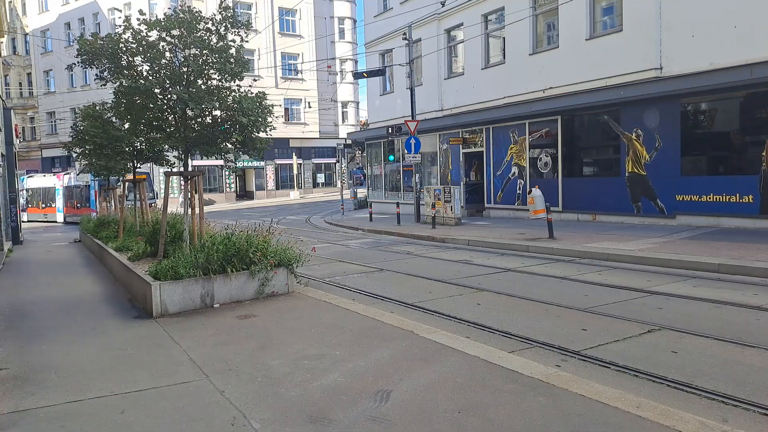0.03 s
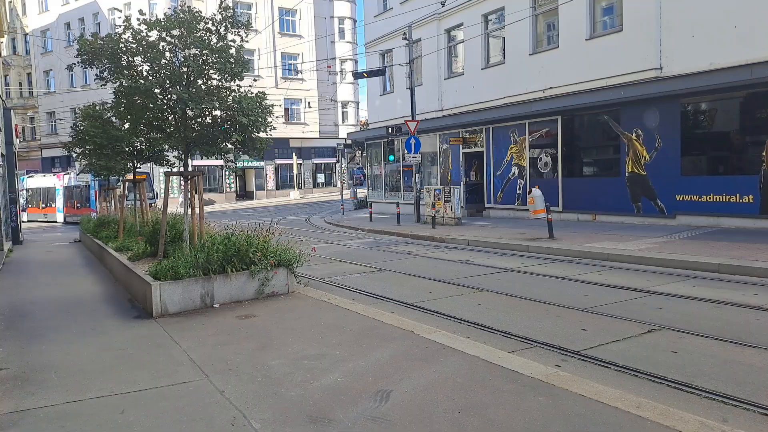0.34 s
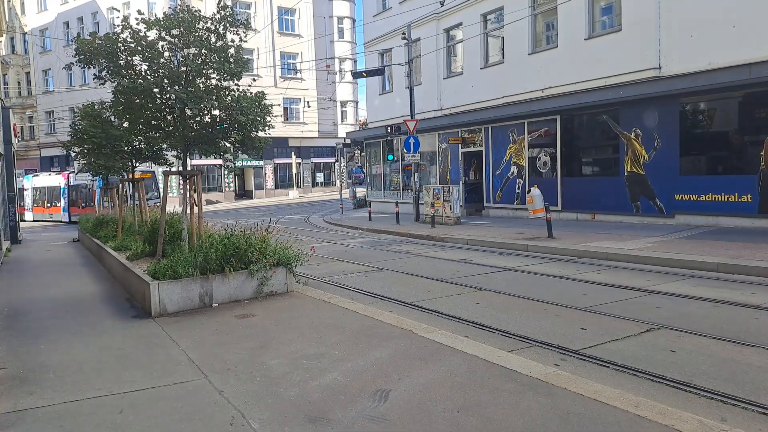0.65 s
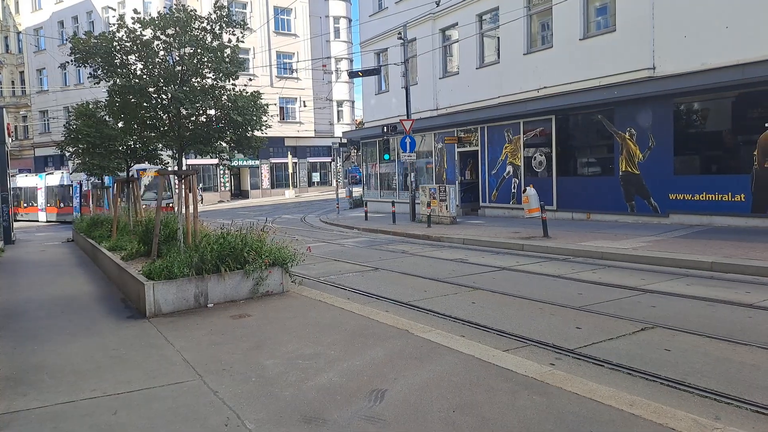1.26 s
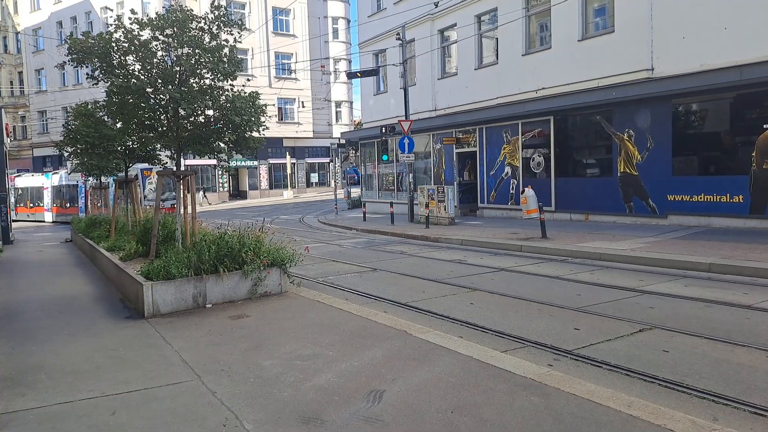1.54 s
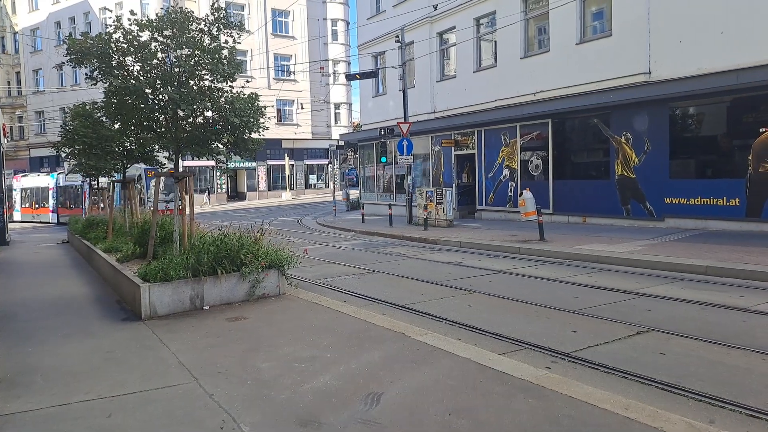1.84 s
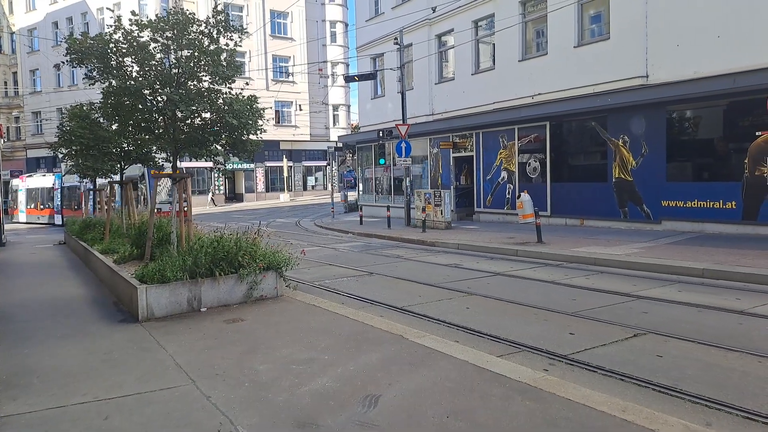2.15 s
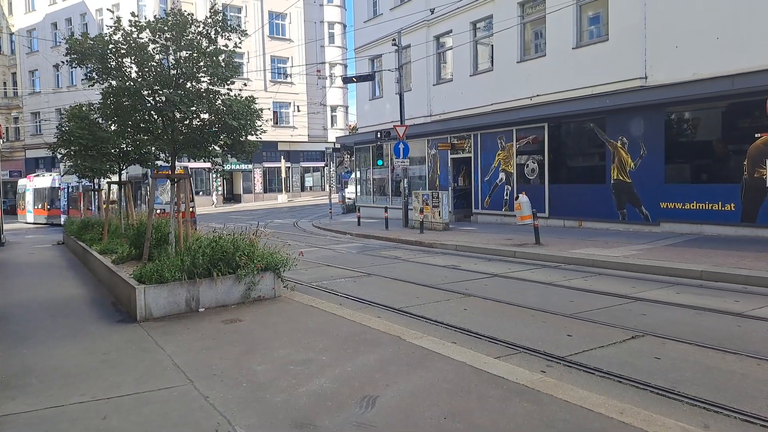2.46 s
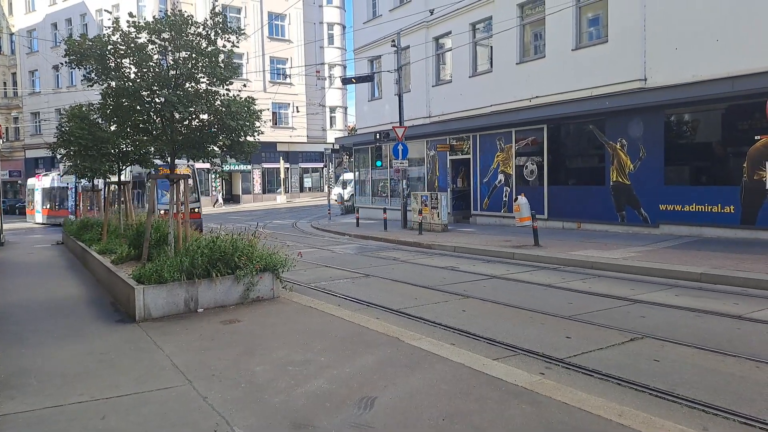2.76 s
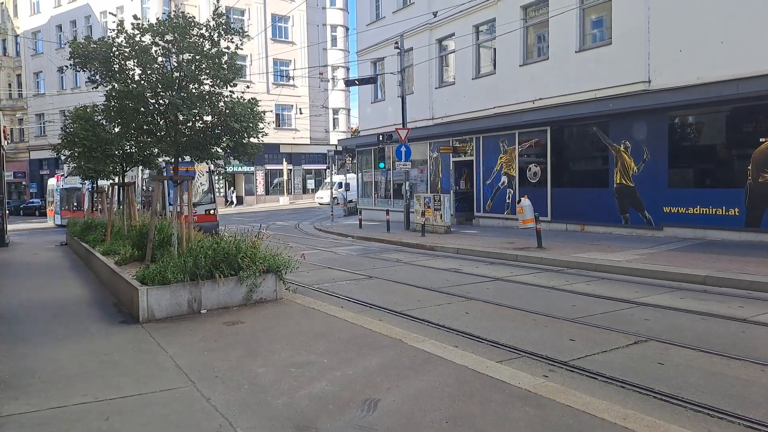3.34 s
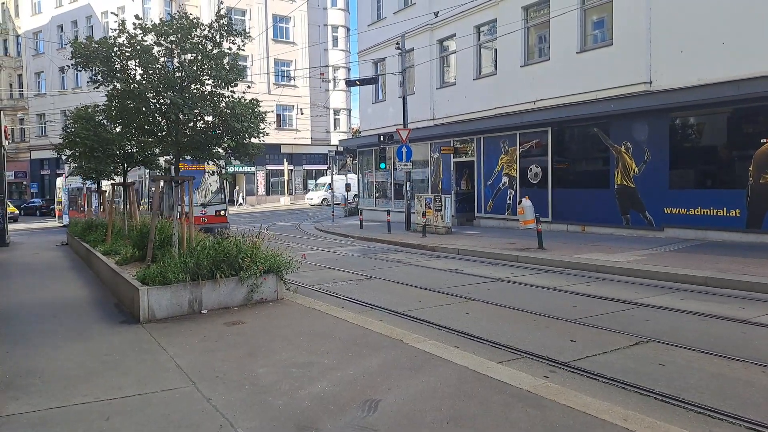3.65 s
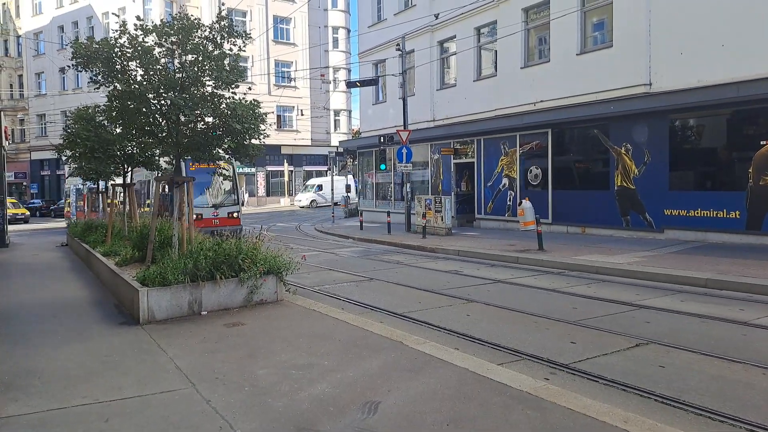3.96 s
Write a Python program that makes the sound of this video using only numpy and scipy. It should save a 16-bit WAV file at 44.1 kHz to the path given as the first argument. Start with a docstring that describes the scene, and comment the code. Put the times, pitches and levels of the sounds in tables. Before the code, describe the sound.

A tram rolls round a far corner of a city street with a low drone and faint, thin rail tones. Distant traffic rumbles and hisses, while puffs of wind brush the hand-held microphone.

```python
"""A tram rolls round a far corner of a city street: its body drones, its wheels ring, the rails sing thinly.
A deep rumble surges underneath, and distant traffic roars with a high tyre hiss that comes and goes.
Puffs of wind brush the two microphone ports of a small hand-held camera.
The sound fades in after a short silence, with a brief rush of air and one dull bump on the left."""
import sys
import numpy as np
from scipy import signal
from scipy.fft import rfft, irfft
from scipy.io import wavfile
from scipy.ndimage import uniform_filter1d

SR = 44100
rng = np.random.default_rng(int(sys.argv[2]) if len(sys.argv) > 2 else 0)


def store_pcm(level_fs):
    """Save levels as 16-bit WAV."""
    pcm = np.round(np.clip(level_fs, -1, 1) * 32767).astype(np.int16)
    wavfile.write(sys.argv[1], SR, np.atleast_2d(pcm).T)


N = 176400
T = np.arange(N) / SR
FREQS = np.maximum(np.arange(N // 2 + 1) * SR / N, 1)


def undb(db):
    """Decibels to gain."""
    return 10 ** (np.asarray(db) / 20)


def unit(x):
    """Scale to rms 1."""
    return x / np.sqrt(np.mean(x ** 2))


def fader(table, column=1):
    """A fader ride: gain over time from one dB column of a table."""
    rows = np.array(table)
    return undb(np.interp(T, rows[:, 0], rows[:, column]))


def across(points):
    """Values at all frequencies, joined on a log axis."""
    rows = np.array(points)
    return np.interp(np.log(FREQS), np.log(rows[:, 0]), rows[:, 1])


def white():
    """Spectrum of fresh white noise."""
    return rfft(rng.standard_normal(N))


def noise(colour):
    """Noise of a given colour, rms 1."""
    return unit(irfft(white() * undb(across(colour)), N))


def wander(hz):
    """Smooth random drift, rms 1, mostly slower than hz."""
    return unit(irfft(white() * np.exp(-(FREQS / hz) ** 2), N))


def pan(db):
    """Left and right gains, the left louder by db."""
    return undb(np.array([[db], [-db]]) / 2)


def gate(start_s, end_s, edge_s):
    """Rise, hold and release, the ramps centred on start and end."""
    return np.clip((T - start_s) / edge_s + .5, 0, 1) * np.clip((end_s - T) / edge_s + .5, 0, 1)


def even(x, share, span_s=0.058):
    """Compress away a share of a noise's chance swells; returns rms 1."""
    power = uniform_filter1d(x ** 2, int(span_s * SR))
    power = uniform_filter1d(power, int(span_s * SR / 2)) + 1e-6
    return unit(x / power ** (share / 2))


def street(colour, octaves=9):
    """Far rolling noise: octave bands wander, and house fronts leave it only partly alike at the ports."""
    # How alike the ports are. Each row: frequency in Hz, coherence (below 0 counts as 0).
    likeness = [(100, 0.75), (330, .87), (530, 0.83), (750, 0.7), (980, 0.41), (1150, 0.66), (1400, 0.52),
                (1680, 0.2), (1880, 0.7), (2030, 0.8), (2320, 0.1), (2700, 0.4), (3100, 0.33), (4700, -0.3),
                (8000, -0.07)]
    # Phase between the ports. Each row: frequency in Hz, lead of the left in radians.
    lead = [(80, 0), (300, .15), (480, .55), (800, .45), (930, .8), (1080, 2.8), (1350, 3.45), (1600, 4.2),
            (1720, 4.9), (1830, 6.05), (2000, 6.3), (2250, 6.9), (2450, 8.8), (2800, 9.9), (3400, 10.6),
            (4700, 13.3)]
    # Stereo balance. Each row: frequency in Hz, left over right in dB.
    balance = [(200, 0), (650, 1), (1300, 0.1), (2600, 0.5), (4400, 1.5), (6000, 2.5), (7500, 3), (9700, 7),
               (12000, 0), (15000, 3.5)]
    alike = np.clip(across(likeness), 0, 1)
    shared = white() * np.sqrt(alike)
    ports = []
    for side in (1, -1):
        coherent = shared * np.exp(.5j * side * across(lead))
        diffuse = white() * np.sqrt(1 - alike)
        ports.append((coherent + diffuse) * undb(side * across(balance) / 2))
    spectrum = np.array(ports) * undb(across(colour))
    octave = np.clip(np.log2(FREQS / 60), 0, octaves - 1)
    out = 0
    for k in range(octaves):
        band = irfft(spectrum * np.maximum(1 - abs(octave - k), 0), N)
        swell_db, flicker_db = .5 * wander(hz=3.2), 1.38 * wander(hz=16.4)
        out = out + band * undb(swell_db + flicker_db)
    return unit(out)


def tram():
    """Drone of the tram's body and the broad ring of its wheels on the rails."""
    # The tram's fader ride. Each row: time in seconds, relative drone and ring levels in dB.
    levels = [(0.6, -34, -40.5), (0.88, -37, -39), (0.93, -38, -45), (1.06, -37.5, -35.5),
              (1.13, -37, -43.5), (1.18, -34.5, -42), (1.48, -37.5, -41.5), (1.52, -32.5, -46),
              (1.63, -40, -43), (1.74, -31.5, -46.5), (1.9, -36.5, -43), (2.13, -35, -43.5),
              (2.27, -32.5, -37.5), (2.41, -35, -43), (2.43, -33.5, -37), (2.57, -31.5, -39.5),
              (2.62, -40, -43), (2.68, -31.5, -35), (2.94, -35, -41), (2.98, -29.5, -42),
              (3.04, -33.5, -37), (3.34, -29.5, -38.5), (3.64, -33, -41.5), (3.78, -38, -42.5),
              (3.92, -32.5, -42), (3.97, -37.5, -38.5)]
    # Low, hollow colour of the body. Each row: frequency in Hz, EQ gain in dB.
    body_colour = [(60, -23), (120, -4.5), (170, -1.5), (240, -0.5), (310, -5), (400, -9.5), (520, -18),
                   (800, -27.5), (5000, -110)]
    # Midrange colour of the wheels. Each row: frequency in Hz, EQ gain in dB.
    wheel_colour = [(300, -23), (520, -9), (620, -3), (720, 0.5), (860, -2.5), (1050, -10), (1500, -29),
                    (6000, -100)]
    drone = fader(levels, column=1) * even(street(body_colour), share=.4)
    ring = fader(levels, column=2) * even(street(wheel_colour), share=.4)
    return undb(1) * (drone + ring)


def rail_tones():
    """Rubbing wheels excite narrow resonances that waver on their way down the street."""
    # Thin singing tones. Each row: start and end in seconds, pitch and width in Hz,
    # level in dB, left over right in dB.
    tones = [(0.35, 4.1, 3368, 48, -60.5, -1), (1.17, 3.1, 4597, 12, -67, -5), (1.17, 3, 4653, 12, -66, 1),
             (1.22, 1.46, 4640, 110, -61, 2), (2.2, 2.42, 4620, 110, -58, 2),
             (2.47, 2.72, 4630, 110, -61, 0), (1.25, 1.85, 9250, 170, -78, 4),
             (2.05, 2.6, 9250, 170, -76, 4), (1.0, 4.1, 6730, 110, -76, -3), (2.0, 2.35, 5210, 70, -69, 1),
             (2.7, 3.2, 5211, 60, -67, 1), (3.76, 4.1, 5215, 70, -66, 1), (3.2, 3.42, 12200, 900, -71, 3),
             (3.35, 3.72, 12500, 650, -78.5, 5)]
    out = 0
    for start, end, hz, width, db, pan_db in tones:
        resonance = 1 / (1 + 2 * ((FREQS - hz) / width) ** 2)
        tone = unit(np.array([irfft(white() * resonance, N) for _ in range(2)]))
        waver_db = 1.5 * wander(hz=6)
        envelope = gate(start, end, edge_s=0.11) * undb(db + waver_db)
        out = out + even(tone, share=.45) * envelope * pan(pan_db)
    return out


def rumble():
    """Deep surging rumble, nearly the same on both sides."""
    # The surges. Each row: time in seconds, relative level in dB.
    surges = [(0.5, -26.5), (0.56, -22.5), (0.67, -28), (0.69, -18.5), (0.8, -29.5), (0.84, -22.5),
              (0.88, -30.5), (0.93, -25), (1.0, -30), (1.02, -21.5), (1.09, -37), (1.19, -28.5),
              (1.22, -39), (1.26, -22.5), (1.32, -32), (1.4, -43), (1.49, -21), (1.58, -41), (1.6, -25),
              (1.65, -39.5), (1.75, -20.5), (1.79, -35.5), (1.84, -20.5), (1.94, -40.5), (1.96, -31),
              (2.1, -37.5), (2.15, -24), (2.33, -30.5), (2.35, -40), (2.43, -26.5), (2.46, -33),
              (2.51, -21), (2.61, -48), (2.66, -23), (2.69, -29), (2.72, -20.5), (2.79, -35), (2.87, -18),
              (2.89, -30), (2.93, -22), (2.95, -39), (3.04, -24), (3.09, -27.5), (3.12, -21.5), (3.15, -30),
              (3.29, -20), (3.34, -28), (3.38, -18), (3.41, -23.5), (3.74, -25), (3.76, -33), (3.91, -23.5),
              (3.94, -32.5), (4.0, -31.5)]
    # Bass-heavy colour. Each row: frequency in Hz, EQ gain in dB.
    colour = [(15, -28), (24, -21), (32, -20), (42, -5.5), (54, 1), (68, -3.5), (85, -3.5), (110, -9),
              (150, -16), (220, -25), (400, -39.5), (3000, -130)]
    mid = even(noise(colour), share=0.71)
    side = undb(-9.5) * noise(colour)
    return undb(0.57) * fader(surges) * np.array([mid + side, mid - side])


def traffic():
    """Roar of distant vehicles and the hiss of their tyres."""
    # The traffic's fader ride. Each row: time in seconds, relative roar and hiss levels in dB.
    levels = [(0.6, -45.5, -75), (0.69, -42, -71), (0.87, -44, -77), (0.94, -45, -69), (1.19, -45, -73.5),
              (1.31, -46.5, -73), (2.1, -45, -70), (2.25, -43.5, -69), (2.38, -46.5, -70), (2.58, -43, -66),
              (2.61, -45.5, -67.5), (2.99, -43.5, -66), (3.02, -45.5, -66), (3.16, -43, -68.5),
              (3.36, -42, -64), (3.51, -43, -67), (3.87, -45.5, -68), (3.95, -44.5, -65)]
    # Broad colour of the roar. Each row: frequency in Hz, EQ gain in dB.
    roar_colour = [(150, -17), (400, -5.5), (700, -7), (1050, -3.5), (1400, -3.5), (1700, -6), (1950, -6.5),
                   (2400, -13.5), (2900, -15.5), (3700, -18), (4400, -21), (5200, -25), (6200, -33),
                   (8000, -38), (15000, -76)]
    # Bright colour of the tyres. Each row: frequency in Hz, EQ gain in dB.
    tyre_colour = [(2500, -15), (5000, -7.5), (7000, 3.5), (8500, -2), (10000, -5.5), (12000, -10),
                   (15500, -17)]
    roar = undb(6.5) * fader(levels, column=1) * street(roar_colour)
    hiss = undb(4.5) * fader(levels, column=2) * street(tyre_colour)
    return roar + hiss


def wind():
    """Each puff buffets the two ports separately and brings a light rustle."""
    # The puffs. Each row: peak time and half-length in seconds, buffet and rustle levels in dB.
    puffs = [(0.65, 0.1, -28, -82), (0.814, 0.15, -20, -85), (1.22, 0.11, -27.5, -82),
             (2.545, 0.084, -23.5, -63), (3.36, .22, -34, -66)]
    # Boomy colour of the buffeting. Each row: frequency in Hz, EQ gain in dB.
    buffet_colour = [(20, -18), (50, -1), (80, 0), (150, -3.5), (220, -11.5), (400, -24), (1000, -51),
                     (5000, -130)]
    # Airy colour of the rustle. Each row: frequency in Hz, EQ gain in dB.
    rustle_colour = [(1000, -31), (3000, 3), (6000, -2), (10000, -5), (14000, -9), (16000, -10)]
    buffet = np.array([even(noise(buffet_colour), share=0.5) for _ in range(2)])
    rustle = np.array([noise(rustle_colour) for _ in range(2)]) * pan(db=3)
    out = 0
    for peak, half_length, buffet_db, rustle_db in puffs:
        swell = np.exp(-2 * ((T - peak) / half_length) ** 2)
        out = out + swell * (undb(buffet_db) * buffet + undb(rustle_db) * rustle)
    return out


def air_rush():
    """A brief hiss of air to the left."""
    # Colour of the rush, dull on top. Each row: frequency in Hz, EQ gain in dB.
    colour = [(1000, 1.5), (2400, -2), (3200, 0), (4400, -6), (5200, 1), (6400, -4), (7200, -18),
              (10000, -34)]
    hiss = np.array([noise(colour) for _ in range(2)])
    return hiss * gate(start_s=.33, end_s=0.897, edge_s=.05) * undb(-54.5) * pan(db=14)


def bump(start_s=.55, hz=196, decay_s=0.0016):
    """A soft, heavily damped knock near the microphone, hard left."""
    age = np.maximum(T - start_s, 0)
    knock = np.sin(2 * np.pi * hz * age) * np.exp(-age / decay_s)
    return knock * undb(-12) * pan(db=23)


def scene():
    """The whole street at the two ports."""
    return tram() + rail_tones() + rumble() + traffic() + wind() + air_rush() + bump()


def record(dry):
    """The camera opens its input, fades it up and cuts the top."""
    open_s, ramp_s, fade_s, top_hz = .388, .002, 0.25, 15720
    opening = np.clip((T - open_s) / ramp_s, 0, 1)
    fade = np.clip(.15 + (T - open_s) / fade_s, 0, 1)
    high_cut = signal.ellip(10, .2, 80, top_hz, fs=SR, output="sos")
    return signal.sosfilt(high_cut, dry * opening * fade)


dry = scene()
out = record(dry)
store_pcm(out)
```